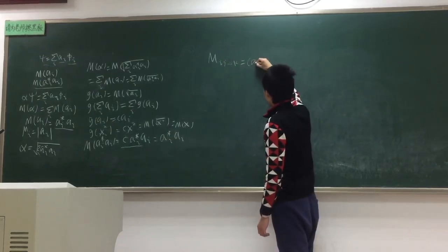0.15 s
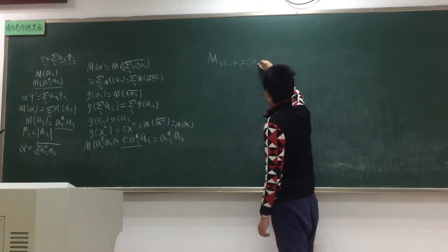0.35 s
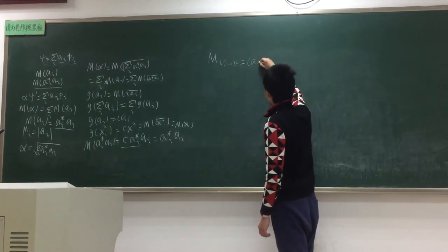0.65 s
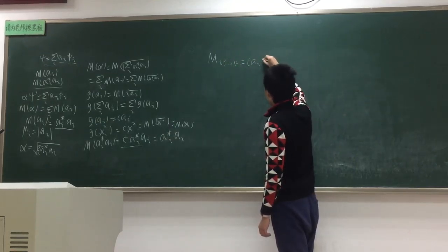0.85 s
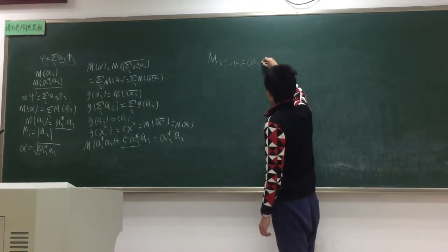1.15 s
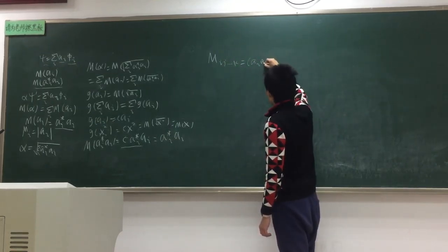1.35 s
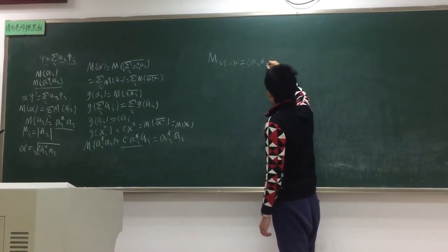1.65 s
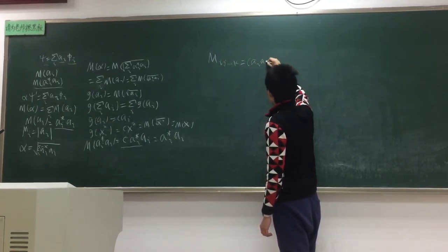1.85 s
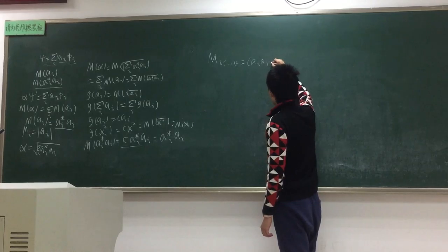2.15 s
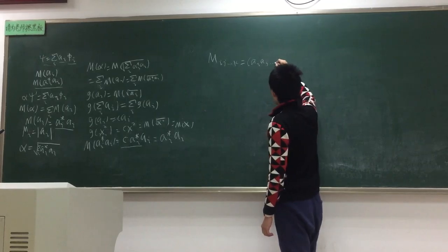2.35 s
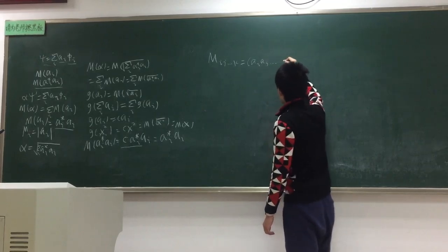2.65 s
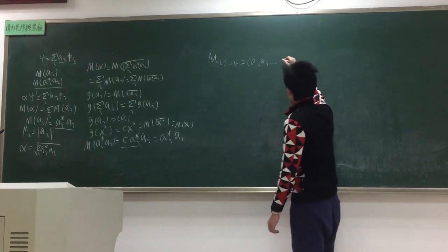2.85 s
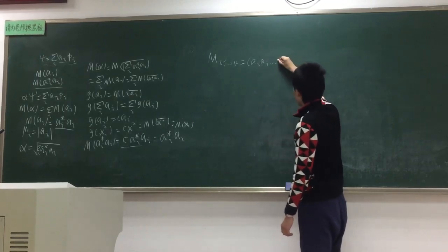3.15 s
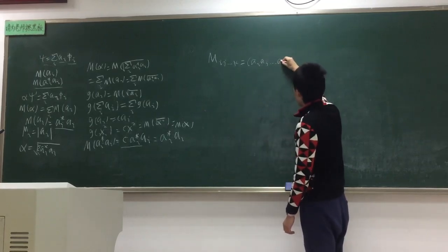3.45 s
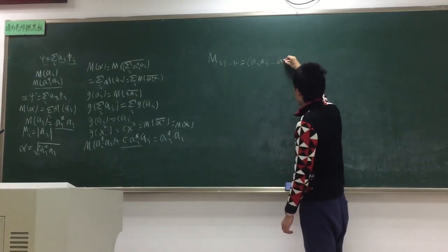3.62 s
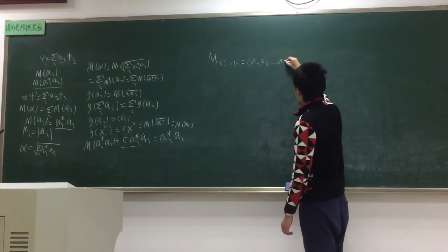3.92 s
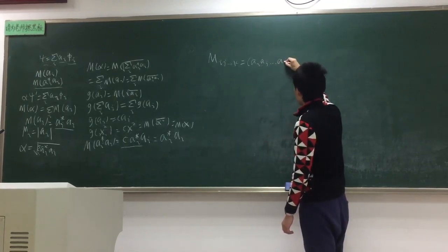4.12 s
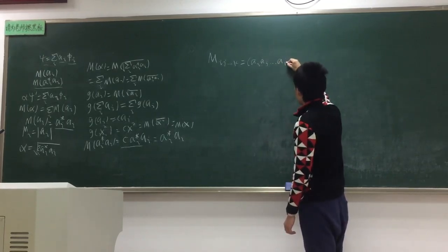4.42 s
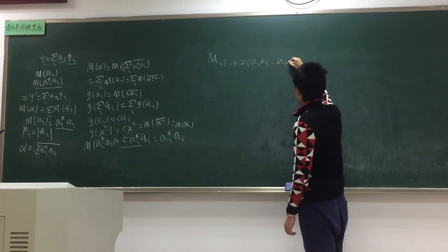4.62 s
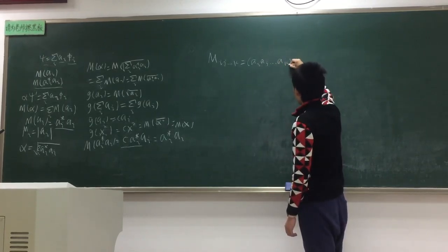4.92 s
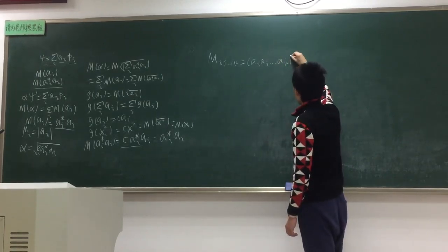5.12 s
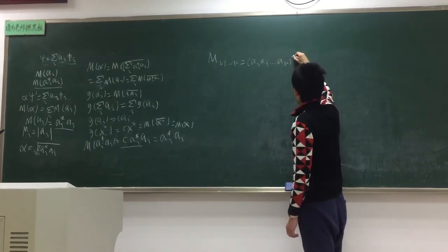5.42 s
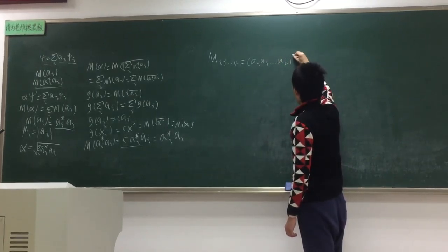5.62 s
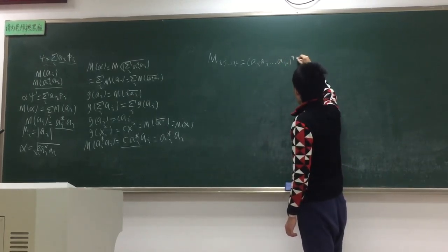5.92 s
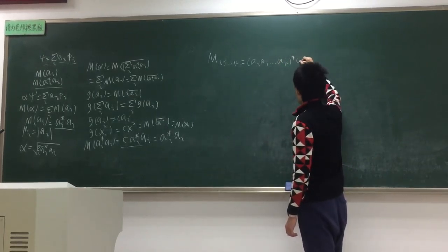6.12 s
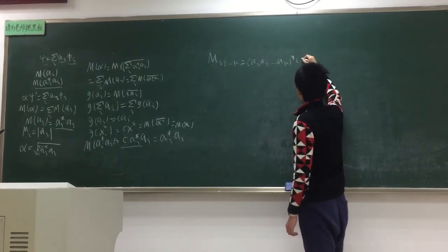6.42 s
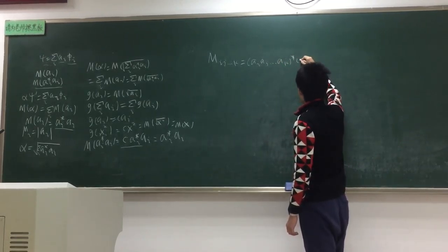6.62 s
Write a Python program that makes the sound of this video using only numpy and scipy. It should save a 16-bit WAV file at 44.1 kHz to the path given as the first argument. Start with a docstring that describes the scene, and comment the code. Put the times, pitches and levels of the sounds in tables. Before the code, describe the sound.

Irregular chalk taps knock against a blackboard a few metres from the microphone, each trailing a light scrape and a short room echo, with occasional tiny snaps of crumbling chalk. The writing stops for a moment as clothing rubs and shoes slide softly, then continues with slightly softer, duller knocks. A quiet rumble and thin hiss fill the lecture room throughout.

```python
"""Chalk on a wall blackboard

Someone writes in a bare lecture room, a few metres away. Each stroke opens with an impact that
excites the bending modes of the panel and the reverberation of the room; the chalk then drags
faintly by stick-slip friction, and crumbs snap off. Midway the writer steps sideways, with rubbing
cloth, sliding soles and soft bumps. A low rumble and a faint hiss fill the room."""
import sys
import numpy as np
from scipy import signal
from scipy.fft import rfft, irfft
from scipy.io import wavfile

SR = 44100
rng = np.random.default_rng(int(sys.argv[2]) if len(sys.argv) > 2 else 0)


def dump(signal):
    """Clip the signal to [-1, 1] and save it as 16-bit WAV at the path in sys.argv[1]."""
    limited = np.clip(np.atleast_2d(signal).T, -1, 1)
    pcm = np.round(limited * 32767).astype(np.int16)
    wavfile.write(sys.argv[1], SR, pcm)


N = 298510

# chalk impacts: t/s, strength/dB, crack of the tip/dB, ping f/Hz, prominence of the ping/dB
IMPACTS = [(-0.22, 2.5, 2, 2540, -4), (0.3821, 7, 7, 2480, 3.5), (0.704, 6.5, 10.5, 2600, 3.5),
           (1.0234, -6, -23, 2440, 5.5), (1.5814, 6.5, 12, 2010, 5), (1.9171, -0.8, -2, 2090, 7),
           (2.1455, 6, -4, 2740, 1.5), (2.302, 3.5, 12, 2820, 3.5), (2.45, 6, 5, 2800, 6),
           (3.851, -22, -5, 2280, -8), (4.21, -6.5, -2, 2700, 7), (4.4786, -1.5, -16, 2600, 5.5),
           (4.8515, 3, 3.5, 2250, 3), (5.2412, 3, 5.5, 2210, 4), (5.5005, 2.5, -3, 2700, 2.5),
           (5.7218, -1.1, -9, 2200, 1.5), (6.026, 4, 1, 2740, 7.5), (6.615, -4, -18, 2320, 7)]
# spectrum of the contact once spread through the room: f/Hz, level/dB
DIFFUSE_SPECTRUM = [(150, -46.5), (380, -15.5), (480, -1.5), (560, 3), (850, 9), (1150, 3), (1650, -7),
                    (3000, -12), (3300, -27.5), (3650, -20.5), (4200, -30), (5800, -23), (7500, -41),
                    (15000, -50)]
KNOCK_AGE = np.arange(SR * 3 // 4) / SR  # time since an impact, t/s


def amp(db):
    """Amplitude ratio of a level in decibels."""
    return 10 ** (np.asarray(db) / 20)


def unit_rms(x):
    """Normalisation to unit mean power."""
    return x / np.sqrt(np.mean(x ** 2) + 1e-20)


def value_at(points, hz):
    """Linear interpolation on a logarithmic frequency axis."""
    f, value = np.transpose(points)
    return np.interp(np.log(hz + 1), np.log(f + 1), value)


def add(mix, s, sound):
    """Superposition of a sound starting at time s; one begun before zero leaves only its tail."""
    start = round(s * SR)
    sound = sound[max(-start, 0):]
    part = mix[max(start, 0):][:len(sound)]
    part += sound[:len(part)]


def colour(x, spectrum, size=2048):
    """Minimum-phase filter: the phase is the Hilbert transform of the log magnitude."""
    hz = abs(np.fft.fftfreq(size, 1 / SR))
    log_gain = np.log(amp(value_at(spectrum, hz)))
    kernel = np.fft.ifft(np.exp(np.conj(signal.hilbert(log_gain)))).real
    return signal.oaconvolve(x, kernel)[:len(x)]


def high_pass(x, hz, order=4):
    """Maximally flat high-pass filter."""
    return signal.sosfilt(signal.butter(order, hz, "high", fs=SR, output="sos"), x)


def noise(spectrum, size=2048):
    """Spectrally shaped Gaussian noise of unit power."""
    return unit_rms(colour(rng.standard_normal(N), spectrum, size))


def wander(per_s):
    """Random modulation: Gaussian values joined by straight lines."""
    return np.interp(np.arange(N) * per_s / SR, np.arange(N), rng.standard_normal(N))


def diffuse_decay(count=SR):
    """Diffuse field: dense reflections form a noise that decays exponentially in each band."""
    reverberation_times = [(300, 0.98), (550, 0.88), (900, 0.73), (2200, 0.55), (3200, 0.55), (5500, 0.29),
                           (12000, 0.31)]  # f/Hz, T60/s
    hz, t, bands = signal.stft(rng.standard_normal(count), SR, nperseg=256)
    decay = amp(-60 * t / value_at(reverberation_times, hz)[:, None])
    return signal.istft(bands * decay, SR, nperseg=256)[1][:count]


def in_room(x, wet_db):
    """Direct sound plus reverberation, by convolution with the room's diffuse response."""
    tail = diffuse_decay()
    return x + amp(wet_db) * signal.oaconvolve(x, tail / np.linalg.norm(tail))[:N]


def background(hiss_db=-73, flutter_db=4.5, flutter_per_s=26):
    """Ambient noise: a steady hiss above a low rumble with random amplitude modulation."""
    hiss_spectrum = [(150, -12.5), (230, 4), (330, 5.5), (480, -3), (950, 0), (1500, -7), (2200, -7),
                     (4000, -13), (7000, -16.5), (9300, -17.5), (10500, -22), (13500, -18), (16000, -34.5)]  # f/Hz, level/dB
    rumble_spectrum = [(10, -75), (20, -35), (31, -18.5), (48, 2.5), (62, -12.5), (75, 2.5), (88, -6),
                       (105, 0.5), (135, -7), (190, -13), (270, -24), (500, -69.5)]  # f/Hz, level/dB
    rumble_levels = [(0, -67), (2, -66.5), (3.1, -61.5), (4.15, -67.5), (4.9, -62), (5.7, -67),
                     (6.77, -64.5)]  # slow course of the rumble: t/s, level/dB
    hiss = amp(hiss_db) * noise(hiss_spectrum)
    rumble = noise(rumble_spectrum, size=8192)
    course_db = np.interp(np.arange(N) / SR, *np.transpose(rumble_levels))
    return hiss + rumble * amp(course_db + flutter_db * wander(flutter_per_s))


def board_modes(lag_s=0.0011, lowest_hz=430, swell_cycles=2.07):
    """Damped panel modes, one a row; dispersion of bending waves brings the low ones late."""
    panel_modes = [(532.8, 7, 0.045), (769, -7, 0.13), (924, -13, 0.071), (1122, -18.5, 0.12),
                   (1120, -10, 0.034), (541.4, -24.5, 0.95), (591, -28, 0.32), (686, -27.5, 0.71),
                   (780, -31, 0.36), (842, -35.5, 1), (927, -19.5, 0.68), (944, -29.5, 1),
                   (1010, -19, 0.42), (1263, -18.5, 0.21), (1375, -25, 0.41), (2060, -22, 0.1),
                   (2424, -35.5, 0.69), (3080, -38.5, 0.58)]  # f/Hz, level/dB, T60/s
    hz, db, t60 = np.transpose(panel_modes)[:, :, None]
    age = np.maximum(KNOCK_AGE - lag_s * hz.min() / hz, 0)
    swell = 1 - np.exp(-age * hz / swell_cycles)
    modes = amp(db - 60 * age / t60) * swell * np.sin(2 * np.pi * hz * age)
    return high_pass(modes + 1e-20, lowest_hz, order=6)  # little radiation below the first mode


def impact_spectrum(strength_db, crack_db, ping_hz, ping_db, thump_db, spacing_hz=1400):
    """A harder impact has a shorter contact time, hence a brighter spectrum (f/Hz, level/dB)."""
    hz = np.geomspace(300, 16000, 120)
    tilt_db = 0.12 * strength_db  # more ping, less thump
    slope_db = value_at([(540, thump_db - tilt_db), (750, 0), (1200, 0),
                         (1900, tilt_db), (3500, tilt_db), (12000, crack_db)], hz)
    # the grip favours one pitch and leaves hollows beside it
    midrange = value_at([(900, 0.11), (1400, 0.59), (3200, 0.65), (4200, 0)], hz)
    ripple_db = midrange * ping_db * np.cos(2 * np.pi * (hz - ping_hz) / spacing_hz)
    return np.c_[hz, strength_db + slope_db + ripple_db]


def chalk_knocks(ring_db=-33, click_db=-13, scatter_db=-32, tail_db=-35,
                 scatter_s=0.01, build_s=0.0069, shared=0.21, spot_db=1, sidestep_s=3):
    """Impact excitation: a click with early reflections, the panel's free vibration, reverberation."""
    reflections = [(.0047, -11), (0.0162, -11)]  # early reflections, the first from the floor: delay t/s, level/dB
    contact_spectrum = [(200, -14.5), (410, -12), (560, -30), (900, 9), (1600, -13), (2950, -7.5),
                        (3400, -20), (6000, -30), (7500, -40), (15000, -42.5)]  # f/Hz, level/dB
    out, t = np.zeros(N), KNOCK_AGE
    click = signal.unit_impulse(len(t))
    for delay, db in reflections:
        add(click, delay, amp([db]))
    modes = amp(ring_db) * board_modes()
    common = diffuse_decay(len(t))  # neighbouring spots share part of their path through the room
    for s, strength_db, crack_db, ping_hz, ping_db in IMPACTS:
        scatter = amp(scatter_db) * rng.standard_normal(len(t)) * np.exp(-t / scatter_s)
        contact = colour(amp(click_db) * click + scatter, contact_spectrum)
        ring = amp(spot_db * rng.standard_normal(len(modes))) @ modes  # the spot sets each mode's share
        paths = np.sqrt(shared) * common + np.sqrt(1 - shared) * diffuse_decay(len(t))
        tail = amp(tail_db) * colour(paths * (1 - np.exp(-t / build_s)), DIFFUSE_SPECTRUM)
        thump_db = -2 if s < sidestep_s else 1  # the panel thumps more at the spot after the sidestep
        spectrum = impact_spectrum(strength_db, crack_db, ping_hz, ping_db, thump_db)
        add(out, s, colour(contact + ring + tail, spectrum))
    return out


def chalk_drag(drag_db=-65, peak_s=0.11, slips_per_s=700):
    """Stick-slip friction: after landing, the tip crosses the board in tiny uneven jerks."""
    pressure, t = np.zeros(N), np.arange(SR) / SR
    stroke = (t / peak_s) ** 2 * np.exp(1 - (t / peak_s) ** 2)
    for s, strength_db, *_ in IMPACTS:
        add(pressure, s, amp(strength_db) * stroke)
    slips = rng.standard_normal(N) * (rng.random(N) < slips_per_s / SR)
    friction = unit_rms(colour(slips, DIFFUSE_SPECTRUM))
    return in_room(amp(drag_db) * pressure * friction, wet_db=-1)


def crumbs(gain_db=6, decay_s=0.0014):
    """Brittle fracture: tiny bright snaps, mostly crumbs leaving the tip as a stroke ends."""
    snaps = [(0.868, -70.5), (1.2114, -70), (1.3768, -68.5), (2.911, -64), (5.014, -70), (5.495, -70),
             (5.67, -70), (6.179, -64)]  # t/s, relative level/dB
    snap_spectrum = [(2000, -64), (6000, -24), (9000, 10), (10500, -1), (13500, -2), (16000, -1)]  # f/Hz, level/dB
    out, t = np.zeros(N), np.arange(SR // 20) / SR
    for s, db in snaps:
        add(out, s, amp(db + gain_db) * rng.standard_normal(len(t)) * np.exp(-t / decay_s))
    return in_room(colour(out, snap_spectrum), wet_db=-3)


def bumps(width_octaves=0.22):
    """Band-limited transients: short puffs around one pitch, mostly the writer's light contacts, plus one
    bright crumb snap."""
    contacts = [(0.942, -63.5, 162, 0.013), (1.283, -66.5, 600, 0.014), (1.278, -74, 2570, 0.032),
                (2.705, -62.5, 299, 0.013), (2.909, -50.5, 2800, 0.0024), (2.924, -65, 2180, 0.022),
                (2.917, -62, 650, 0.015), (3.139, -53, 560, 0.013), (3.162, -60, 800, 0.015),
                (3.254, -60, 900, 0.0079), (3.268, -63, 2580, 0.014), (3.289, -56.5, 445, 0.015)]  # t/s, level/dB, centre f/Hz, duration/s
    out, t = np.zeros(N), np.arange(SR // 2) / SR
    hz = np.fft.rfftfreq(len(t), 1 / SR) + 1
    for s, db, centre_hz, length_s in contacts:
        passband = np.exp(-0.5 * (np.log2(hz / centre_hz) / width_octaves) ** 2)
        band = irfft(rfft(rng.standard_normal(len(t))) * passband)
        puff = band * t / length_s * np.exp(-2 * t / length_s)
        rms = np.sqrt(np.sum(puff ** 2) / (2 * length_s * SR))
        add(out, s, amp(db) * puff / rms)
    return out


def rubbing_speed(movements, stop_share=0.64, roundness=1.06):
    """Velocity envelope: a limb stops in a share of the time it takes to accelerate."""
    t, speed = np.arange(N) / SR, np.zeros(N)
    for s, db, rise_s in movements:
        from_peak = np.maximum((s - t) / rise_s, (t - s) / (stop_share * rise_s))
        speed += amp(db) * np.exp(-from_peak ** roundness)
    return speed


def cloth(body_db=-4, fizz_db=-9, flutter_db=2, fizz_hz=4500):
    """Friction noise of fabric: creases flutter, and faster rubbing is louder and brighter."""
    swings = [(2.70, -58.5, 0.017), (2.915, -58, 0.11), (3.275, -66, 0.017), (3.385, -57, 0.097)]  # sleeve and trousers: peak t/s, relative level/dB, rise time/s
    cloth_spectrum = [(200, -3), (500, -31), (900, -6), (1250, 0.5), (1800, 3.5), (2200, 0.5), (3000, 5),
                      (4100, -7.5), (6500, -9.5), (8500, -20), (15000, -28)]  # f/Hz, level/dB
    speed = rubbing_speed(swings)
    creases = amp(flutter_db * wander(per_s=280))
    body = amp(body_db) * noise(cloth_spectrum)
    fizz = amp(fizz_db) * unit_rms(high_pass(noise(cloth_spectrum), fizz_hz))
    return speed * creases * (body + fizz * speed / speed.max())


def shoes(gain_db=-2):
    """Sliding friction: soles on the floor give a dull rush in proportion to their speed."""
    slides = [(2.89, -64, .2), (3.31, -57, 0.076)]  # peak t/s, relative level/dB, rise time/s
    sole_spectrum = [(80, -2), (230, -8), (330, 1), (450, -6), (800, -2), (1300, -15), (3000, -48)]  # f/Hz, level/dB
    return amp(gain_db) * rubbing_speed(slides) * noise(sole_spectrum)


def scene():
    """Superposition of all sources at one microphone."""
    writer = in_room(cloth() + shoes() + bumps(), wet_db=-7.5)
    return (chalk_knocks() + chalk_drag() + crumbs() + writer + background())[None]


def record(dry, low_hz=34.4, high_hz=15900):
    """Band limiting: the recorder cuts the deepest bass and the highest treble."""
    low_pass = signal.firwin(255, high_hz, window=("kaiser", 9), fs=SR)
    return signal.oaconvolve(high_pass(dry, low_hz), low_pass[None], "same")


dry = scene()
out = record(dry)
dump(out)
```